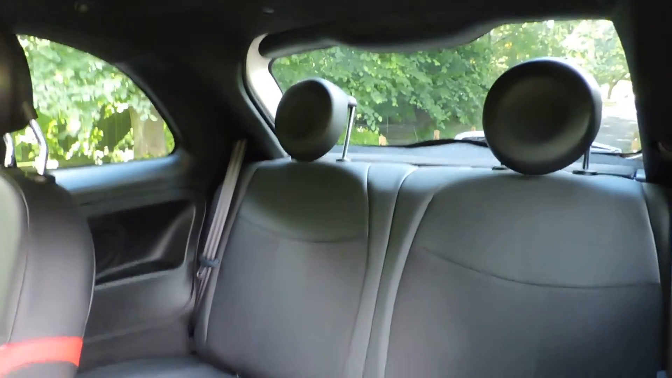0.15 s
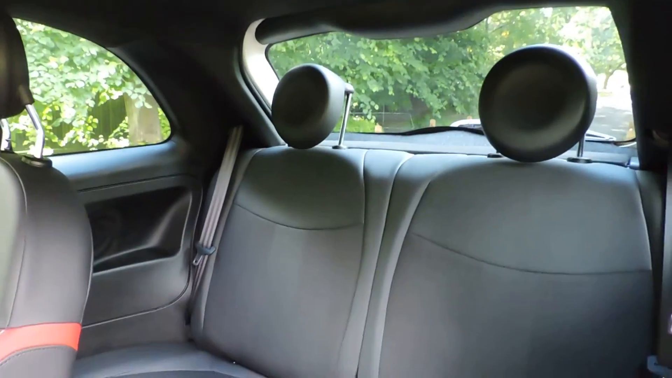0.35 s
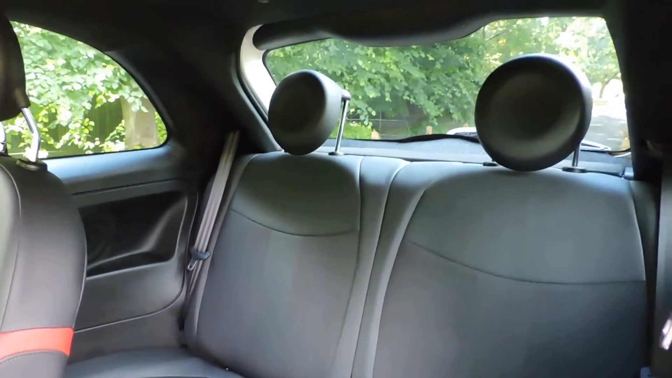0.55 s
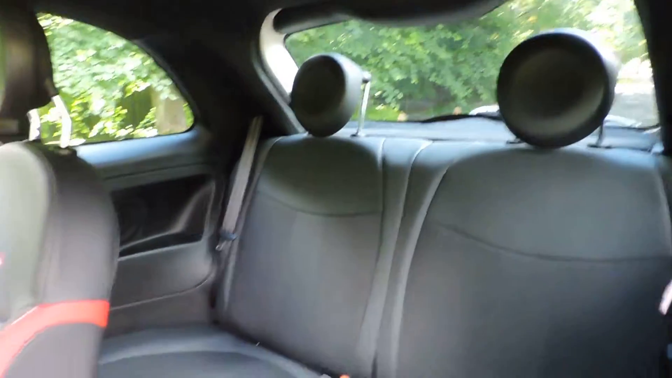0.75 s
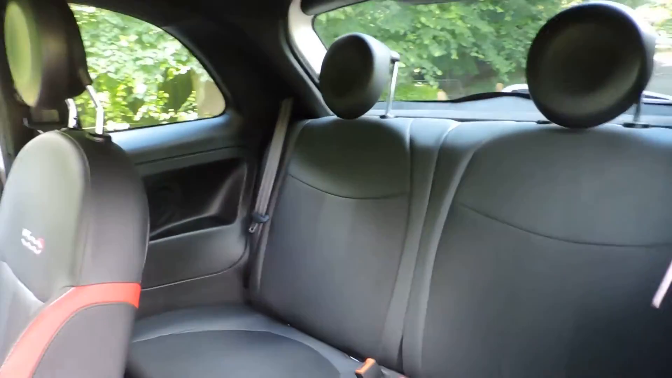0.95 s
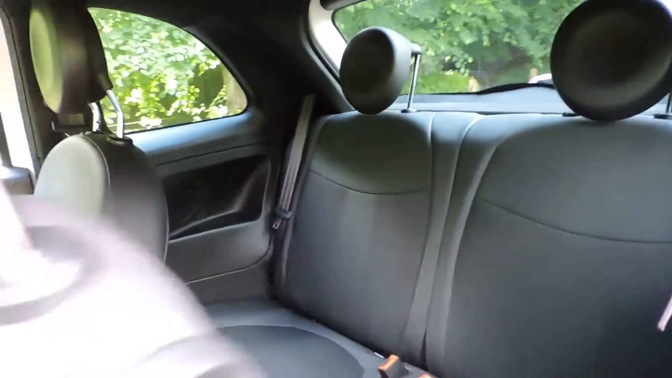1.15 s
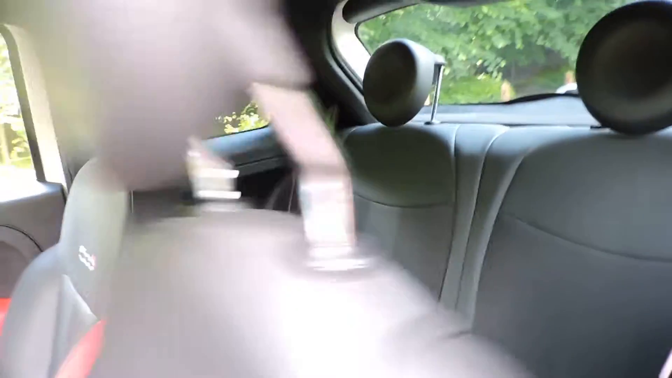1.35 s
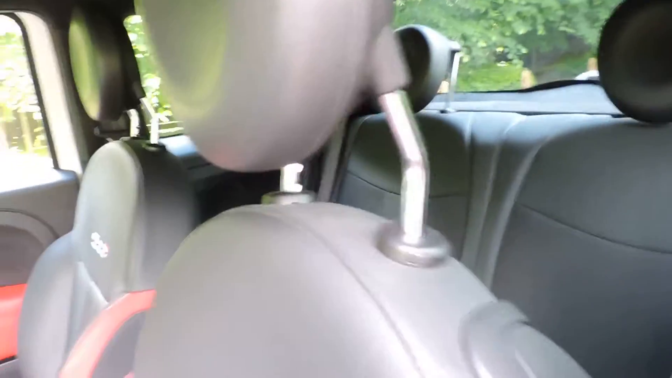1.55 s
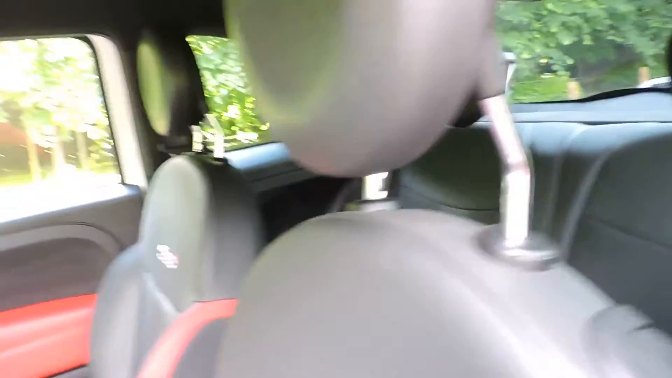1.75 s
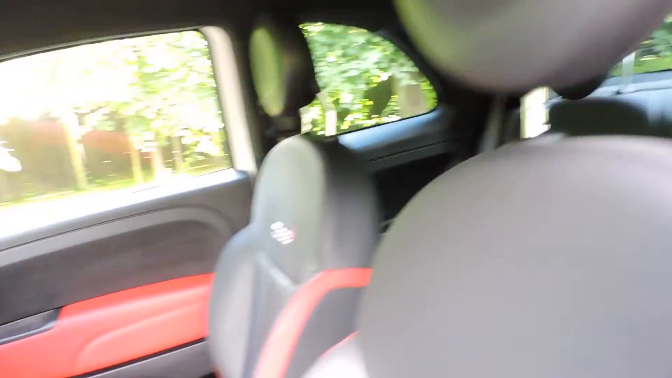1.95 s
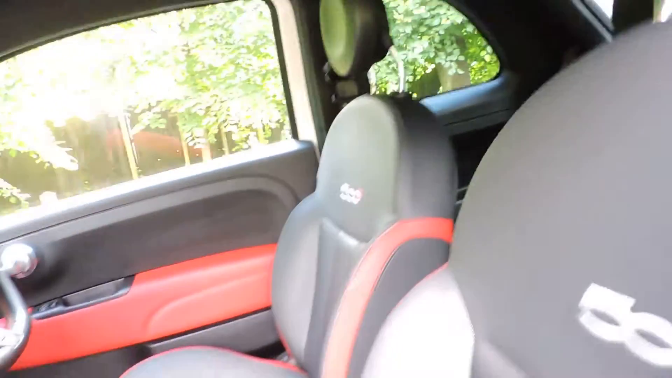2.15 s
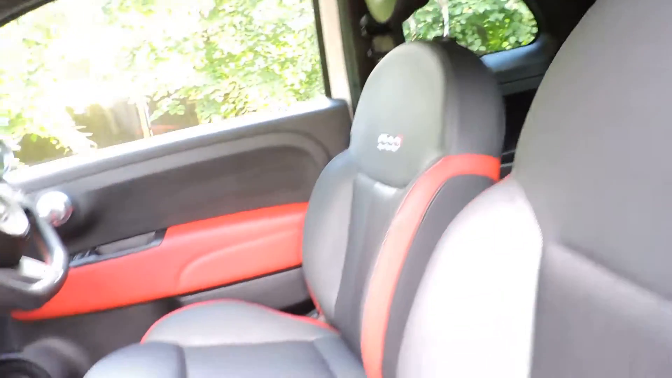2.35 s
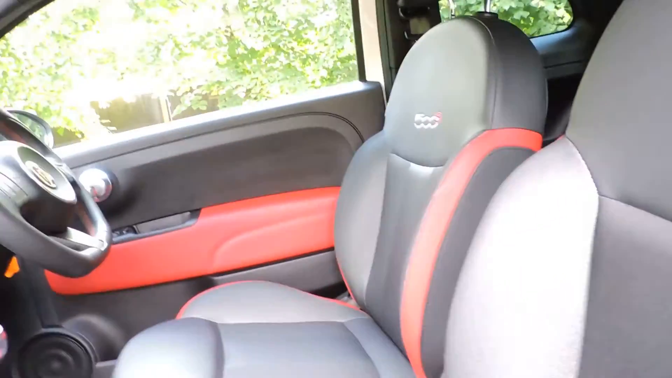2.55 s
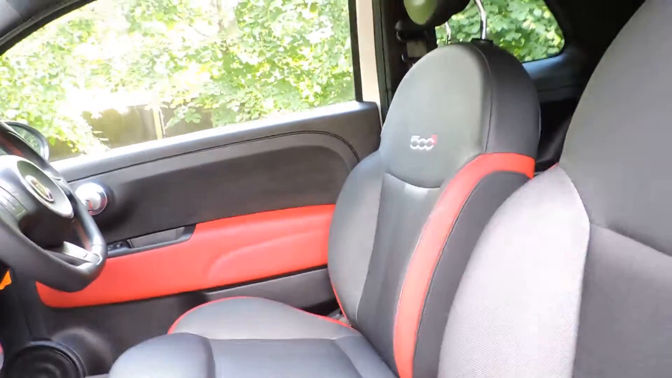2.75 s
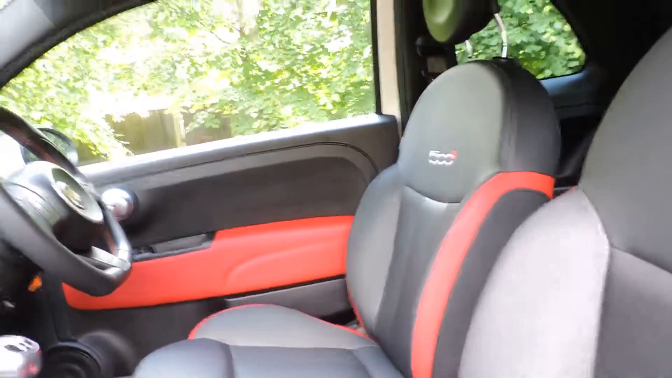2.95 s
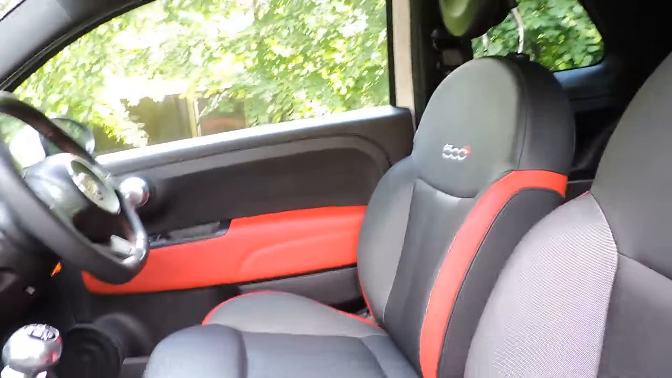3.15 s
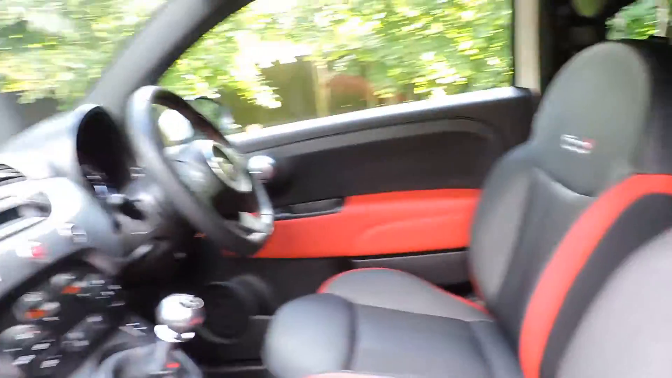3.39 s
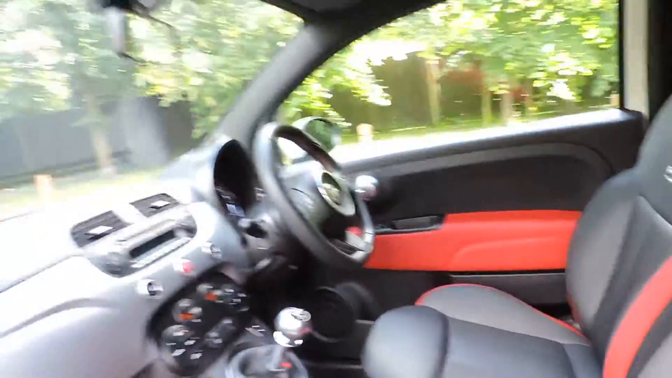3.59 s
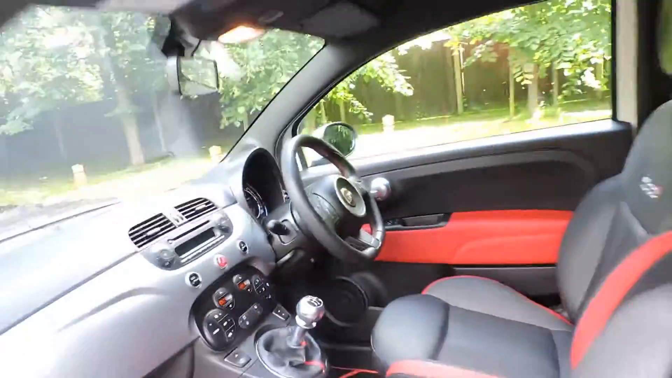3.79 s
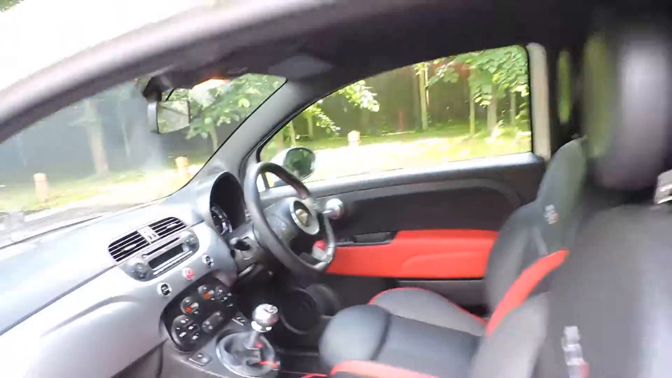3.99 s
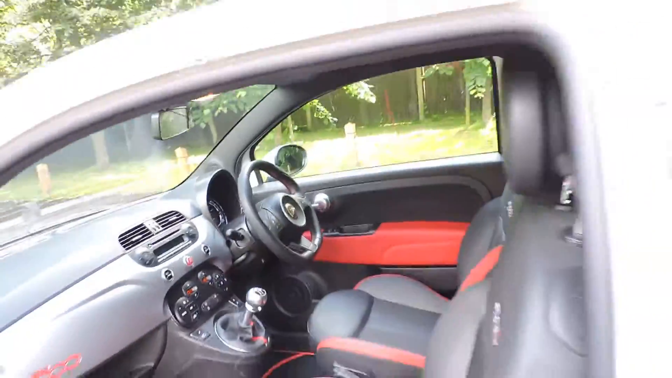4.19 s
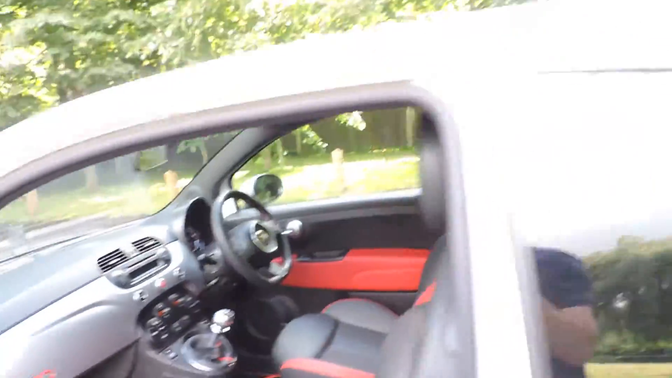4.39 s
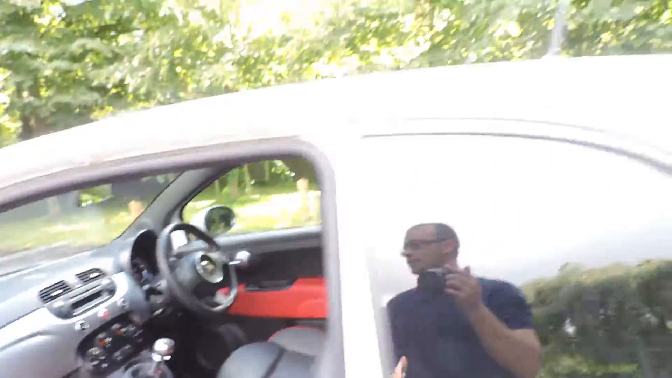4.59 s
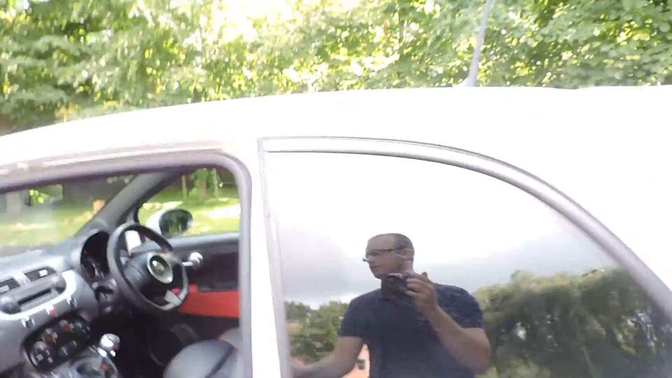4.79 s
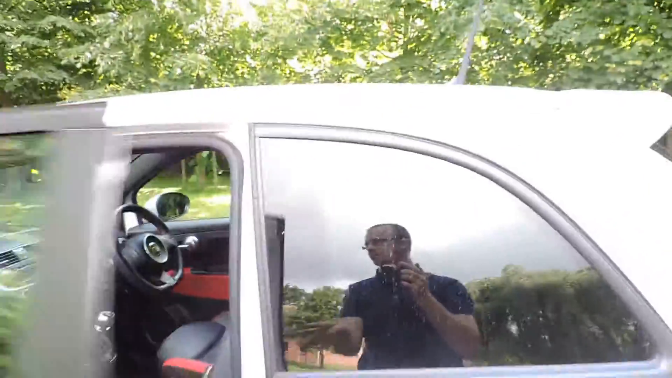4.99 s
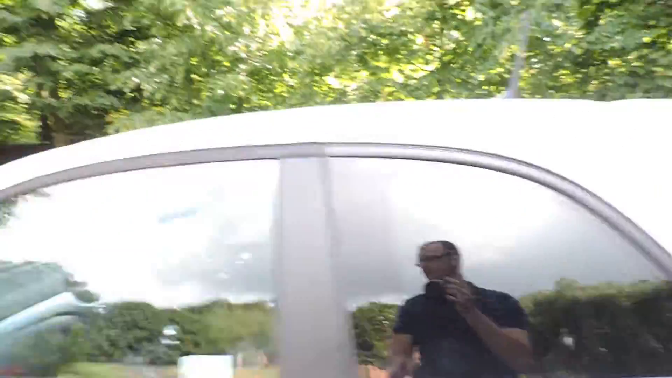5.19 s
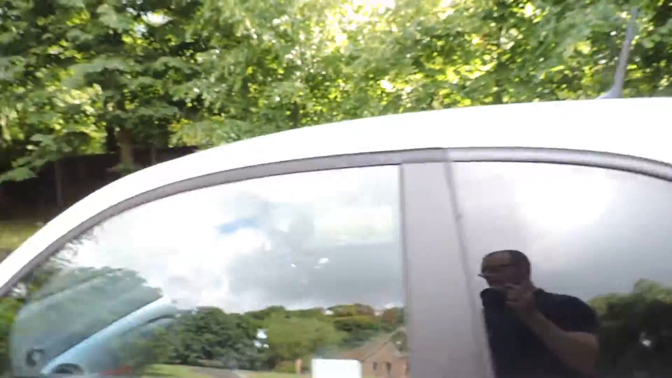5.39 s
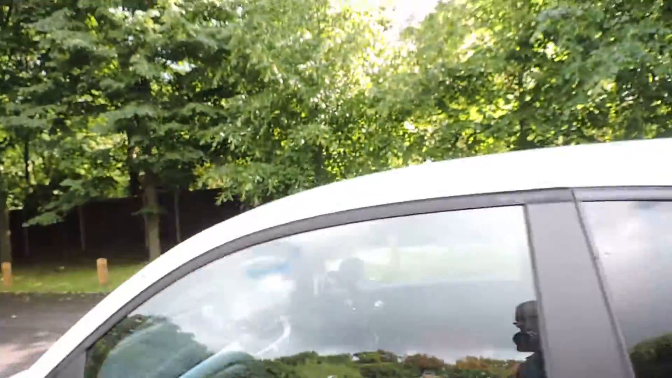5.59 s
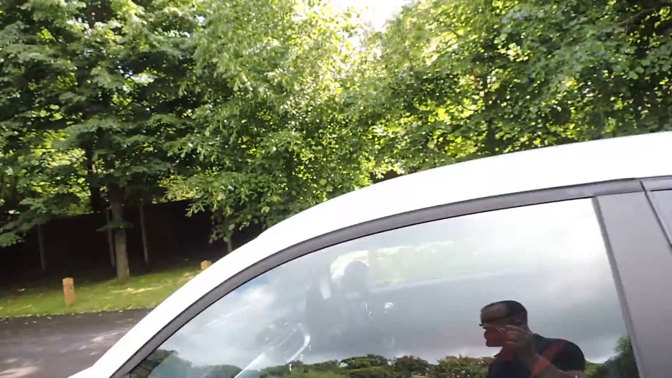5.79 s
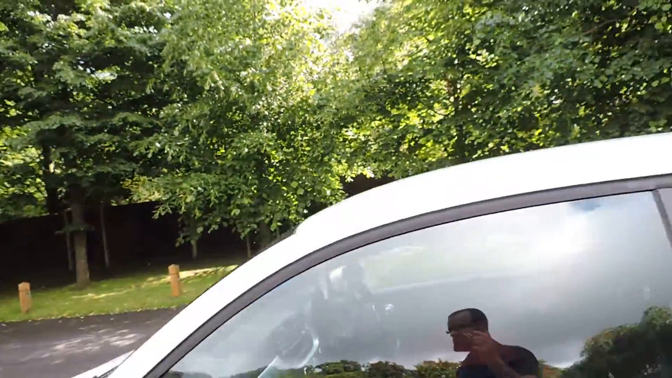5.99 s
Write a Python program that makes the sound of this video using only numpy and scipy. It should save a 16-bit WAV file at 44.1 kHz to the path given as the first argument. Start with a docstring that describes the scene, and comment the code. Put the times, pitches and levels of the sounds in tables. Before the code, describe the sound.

Low wavering hum with thin birdsong, a sharp seat-catch snap, a booming seat thud, rattling knocks, and an overloading car door slam.

```python
"""Inside a small parked car, over a wavering hum and soft hiss, a bird whistles the first of its thin falling sweeps.
A catch snaps open and a seat back swings up against its stop: noise bursts, ringing modes and low cabin booms.
Someone climbs out with knocks, ticks, brushing clothes (swelling noise), a ringing spring and hollow clacks.
The door slams: striker ring, panel modes and boom overload the microphone; the gain control ducks after loud blows.
The background comes back up, and the bird whistles once more."""
import sys
import numpy as np
from scipy import signal
from scipy.fft import rfft, irfft, next_fast_len
from scipy.io import wavfile
from scipy.ndimage import uniform_filter1d

SR = 44100
rng = np.random.default_rng(int(sys.argv[2]) if len(sys.argv) > 2 else 0)


def store_pcm(level_fs):
    """Save levels as 16-bit WAV."""
    pcm = np.round(np.clip(level_fs, -1, 1) * 32767).astype(np.int16)
    wavfile.write(sys.argv[1], SR, np.atleast_2d(pcm).T)


N = 265923
TIME = np.arange(N) / SR  # s
AGE = TIME[:SR // 2]  # time since an event began, s
PORT_HZ = 2540  # about here and above, the two microphone ports hear unrelated noise


def undb(db):
    """Decibels to gain."""
    return 10 ** (np.asarray(db) / 20)


def unit(x):
    """Scale to rms 1."""
    return x / np.sqrt(np.mean(x ** 2))


def fade(t60):
    """Exponential decay that loses 60 dB in t60 seconds."""
    return np.exp(-np.log(1000) * AGE / max(t60, 1e-3))


def add(out, s, x):
    """Mix x into out from time s."""
    i = max(int(s * SR), 0)
    out[:, i:i + x.shape[-1]] += x[..., :N - i]


def bins(size):
    """Frequencies of a spectrum of this many samples, kept at 1 Hz or above."""
    return np.maximum(np.fft.rfftfreq(size, 1 / SR), 1)


def colour(points, tilt_db=0):
    """Gain against frequency through (f/Hz, level/dB) points, tilted by tilt_db per octave."""
    hz, db = np.transpose(points)
    return lambda f: undb(np.interp(np.log(f), np.log(hz), db) + tilt_db * np.log2(f))


def resonance(hz, width):
    """Gain against frequency of a steep-sided resonance; 0.85 of width sets its breadth."""
    return lambda f: 1 / (1 + ((f * f - hz * hz) / (f * width * 0.85)) ** 2)


def noise(gain, size):
    """Coloured stereo noise of rms 1: nearly alike at both ports in the bass, unrelated in the treble."""
    f = bins(size)
    mid, side = np.exp(2j * np.pi * rng.random((2, len(f))))
    apart = np.minimum(0.1 + (f / PORT_HZ) ** 1.13, 1)
    ports = mid + apart * side * np.array([[1], [-1]])
    return unit(irfft(gain(f) * ports / np.hypot(1, apart), size))


def burst(gain, envelope):
    """Coloured noise under an envelope, carrying just the energy of that envelope."""
    return unit(noise(gain, len(AGE)) * envelope) * np.sqrt(np.mean(envelope ** 2))


def blow(gain, t60, rise, cabin_db, cabin_t60):
    """A contact builds up over rise seconds and sets off a dense rattle and the duller tail of the cabin."""
    contact = 1 - np.exp(-AGE / rise)
    tail = burst(lambda f: gain(f) / np.hypot(1, f / 2500), contact * fade(cabin_t60))
    return burst(gain, contact * fade(t60)) + undb(cabin_db) * tail


def ring(modes):
    """Decaying modes that build up within a cycle; the higher ones reach the two ports out of step."""
    out = 0
    for hz, db, t60 in modes:
        skew = min(hz / PORT_HZ, 1) * np.array([[.9], [-.9]])  # radians
        envelope = (1 - np.exp(-np.pi * hz * AGE)) * fade(t60)
        detuned_hz = hz * (1 + 0.0026 * rng.standard_normal())
        out = out + undb(db) * envelope * np.sin(2 * np.pi * detuned_hz * AGE + skew)
    return out


def heave(hz, rise, t60):
    """One low resonance pushed up over rise seconds and left to die away."""
    return (1 - np.exp(-(AGE / rise) ** 2)) * fade(t60) * np.sin(2 * np.pi * hz * AGE)


def stroke(length, hz, width):
    """Band of noise that swells and fades over length seconds."""
    return np.sin(np.pi * np.minimum(AGE / length, 1)) * noise(resonance(hz, width), len(AGE))


def walk(rate):
    """Slow chance: random levels held 1 / rate s and slewed twice; spread near 1."""
    k = int(SR / rate)
    steps = np.repeat(rng.standard_normal(N // k + 1), k)
    return 1.294 * uniform_filter1d(uniform_filter1d(steps, k), k)[:N]


def background():
    """A wavering low hum and rumble under soft swells of hiss."""
    # background levels with soft swells of hiss: t/s, rumble level/dB, hiss level/dB, before the lifts below
    levels = [(0.0, -40, -52.5), (0.32, -44, -55), (0.92, -38, -51.5), (1.32, -34, -47.5),
              (1.66, -41, -52.5), (2.75, -42.5, -55), (3.01, -38.5, -54.5), (3.43, -41, -51.5),
              (4.36, -37, -53), (4.6, -37, -49.5), (5.15, -39.5, -55), (5.5, -45, -54), (6.03, -40, -54.5)]
    # shared spectrum of rumble and hiss: f/Hz, level/dB
    background_colour = [(13, -5), (22, 0.5), (114, -4.5), (150, 0), (220, -9), (246, -14), (282, -9.5),
                         (438, -15.5), (625, -22), (823, -24), (2330, -33.5), (3930, -43.5), (7810, -51),
                         (11800, -53), (15500, -53.5)]
    # steady hum partials: f/Hz, relative level/dB
    hum_partials = [(58.6, -6.5), (100, -10.5), (143.6, -9.5), (217, -14), (288, -22), (360, -17.5),
                    (432, -20.5)]
    s, *columns = np.transpose(levels)
    rumble_db, hiss_db = (np.interp(TIME, s, c) for c in columns)
    shape, size = colour(background_colour), next_fast_len(N)
    rumble = noise(lambda f: shape(f) / np.hypot(1, (f / 600) ** 2), size)[:, :N]
    hiss = noise(lambda f: shape(f) / np.hypot(1, (600 / f) ** 3), size)[:, :N]
    hum = 0
    for hz, db in hum_partials:
        level = undb(db + 3.2 * walk(9))
        wavering_hz = hz + 1.45 * walk(7.1)
        hum = hum + level * np.sin(2 * np.pi * np.cumsum(wavering_hz) / SR)
    low = undb(rumble_db + 1.0) * (rumble + undb(0.5) * hum)
    return low + undb(hiss_db + 3.5 + 1.26 * walk(12)) * hiss


def bird():
    """Thin whistles that fall fast, then level off, smeared by the trees (a decaying noise echo)."""
    # notes: t/s, length/s, start f/Hz, level/dB before the trees
    bird_notes = [(0.338, 0.12, 7730, -71), (3.084, 0.14, 7700, -71), (4.523, .16, 8000, -64),
                  (4.778, 0.14, 7100, -69), (5.004, .09, 7300, -68), (5.897, 0.16, 8090, -60)]
    fall = .8  # end pitch over start pitch
    out = np.zeros((2, N))
    for s, length, start_hz, db in bird_notes:
        u = np.minimum(AGE / length, 1)
        hz = start_hz * (fall + (1 - fall) * (1 - u) ** 2.1)
        envelope = np.sqrt(np.minimum(12 * u, 1) * (1 - u))
        add(out, s, undb(db) * envelope * np.sin(2 * np.pi * np.cumsum(hz) / SR))
    trees = unit(rng.standard_normal((2, len(AGE))) * fade(0.74)) / np.sqrt(len(AGE))
    return out + undb(5) * signal.fftconvolve(out, trees, axes=1)[:, :N]


def rubs():
    """Low scuffs, faint rushes, brushing clothes and the squeezed door seal: noise swells of uneven level."""
    # low scuffs and soft, faint rushes of noise: middle t/s, length/s, level/dB, centre f/Hz
    scuffs = [(1.106, 0.085, -28.5, 256), (1.132, 0.17, -42.5, 1120), (1.444, .018, -25, 900),
              (2.93, .08, -26.5, 324), (3.332, 0.084, -46.5, 825), (3.932, .2, -57, 5000)]
    # clothes brushing: middle t/s, length/s
    swishes = [(2.029, 0.27), (2.228, 0.32), (3.585, 0.32)]
    scuff_width = 1.85  # as a share of the centre
    cloth_db, cloth_hz, cloth_width_hz = -59, 11000, 5700
    # the rubber seal squeezed as the door closes
    seal_s, seal_length_s, seal_db, seal_hz, seal_width_hz = 5.219, .095, -32.5, 350, 980
    out, unevenness = np.zeros((2, N)), undb(2 * walk(90))
    for s, length, db, hz in scuffs:
        add(out, s - length / 2, undb(db) * stroke(length, hz, scuff_width * hz))
    for s, length in swishes:
        add(out, s - length / 2, undb(cloth_db) * stroke(length, cloth_hz, cloth_width_hz))
    seal = stroke(seal_length_s, seal_hz, seal_width_hz)
    add(out, seal_s - seal_length_s / 2, undb(seal_db) * seal)
    return out * unevenness


def ticks():
    """Light contacts of plastic, each with one broad resonance; the lower ones last longer, down to 600 Hz."""
    # ticks and bumps: t/s, level/dB, centre f/Hz
    tick_hits = [(0.566, -35, 1800), (0.59, -39, 1000), (.884, -38.5, 1190), (1.548, -34, 1340),
                 (1.832, -29, 1470), (3.034, -36, 825), (3.307, -32.5, 600), (3.485, -34, 1350),
                 (3.58, -38.5, 1000), (3.746, -34, 1690), (3.846, -24, 268), (3.987, -28.5, 2020),
                 (4.597, -28, 1610), (5.047, -35, 1640), (5.548, -25, 1490)]
    width, cycles = 0.7, 31.5  # share of the centre; cycles to lose 60 dB, for centres from 600 Hz
    out = np.zeros((2, N))
    for s, db, hz in tick_hits:
        t60 = cycles / max(hz, 600)
        tick = blow(resonance(hz, width * hz), t60, rise=0.00075, cabin_db=-13, cabin_t60=0.1)
        add(out, s, undb(db) * tick)
    return out


def rattles():
    """Loose fittings are shaken into brief noise bursts, all with the same bright colour."""
    # shakes: t/s, level/dB, t60/s
    shakes = [(2.894, -39, 0.21), (3.303, -35.5, 0.11), (3.337, -44, 0.24), (3.847, -41, .07),
              (3.973, -42.5, 0.13), (4.449, -46.5, 0.16), (5.235, -22, 0.052)]
    # spectrum: f/Hz, level/dB
    rattle_colour = [(300, -9), (1500, 8), (3000, -4), (6000, -2.5), (9500, -7.5), (13500, -0.5),
                     (15500, -11)]
    out = np.zeros((2, N))
    for s, db, t60 in shakes:
        rattle = blow(colour(rattle_colour), t60, rise=0.0006, cabin_db=-19, cabin_t60=0.09)
        add(out, s, undb(db) * rattle)
    return out


def clacks():
    """A loose hollow part bounces against the trim, ringing over a short noisy chatter."""
    # bounces: t/s, level/dB
    bounces = [(3.337, -30.5), (3.348, -32), (3.3753, -18.5), (3.4074, -25.5)]
    # hollow ring: f/Hz, level/dB, t60/s
    clack_modes = [(595, -23, 0.013), (910, 1.5, 0.023), (1004, -9, 0.048), (1090, -30, 0.015),
                   (2100, -25, 0.05)]
    out = np.zeros((2, N))
    for s, db in bounces:
        chatter = blow(resonance(660, 650), 0.058, rise=0.00042, cabin_db=-28, cabin_t60=0.13)
        add(out, s, undb(db) * (ring(clack_modes) + undb(-8.5) * chatter))
    return out


def knocks():
    """Padded blows on seat and trim: a noise thud, tilted bright or dull, with ringing trim; a spring rings on."""
    # blows: t/s, relative level/dB, rattle t60/s, tilt/(dB per octave), relative ring level/dB
    knock_hits = [(0.622, -28.5, 0.063, 0, -11), (1.4461, -4.5, 0.036, 1.4, -3),
                  (1.4585, -21.5, 0.12, -1.8, 3), (1.489, -18, 0.16, -3.5, -9), (1.657, -30.5, 0.06, 2, -2),
                  (2.404, -34.5, 0.13, 4, -2), (2.8945, -17.5, 0.063, -0.5, 1),
                  (2.901, -13, 0.13, -2.2, -2), (2.938, -22, 0.076, 1, 7), (2.953, -17.5, 0.06, -3, -2),
                  (3.181, -24, 0.15, 1.7, -18)]
    # trim ring: f/Hz, level/dB, t60/s
    trim_modes = [(105, -9, 0.13), (136.2, -1.5, 0.21), (183.4, 0.5, .2), (234.5, 3.5, 0.27),
                  (315, -9.5, 0.12), (344.7, -4, 0.19), (436, -9, 0.17), (620, -9, 0.054), (716, -8, 0.07),
                  (907, -5, 0.06), (1318, -6.5, 0.063), (1825, -23, .1), (2140, -23.5, 0.054),
                  (3510, -34.5, 0.052)]
    # thud spectrum: f/Hz, level/dB
    trim_colour = [(47, -38), (80, -4), (263, -3), (343, -8.5), (809, -13), (903, -12), (1130, -24.5),
                   (2230, -24), (2970, -35), (13900, -56), (15500, -68)]
    # spring left ringing: f/Hz, level/dB, t60/s
    spring_modes = [(456, 1.5, 0.65), (647, -9, 1.3), (850, -36, 4.4), (1163, -9.5, 0.38)]
    spring_s, spring_db = 3.185, -36
    out = np.zeros((2, N))
    for s, db, t60, tilt_db, ring_db in knock_hits:
        thud = blow(colour(trim_colour, tilt_db), t60, rise=0.00056, cabin_db=-13.0, cabin_t60=0.2)
        add(out, s, undb(db - 2) * (thud + undb(ring_db - 9) * ring(trim_modes)))
    add(out, spring_s, undb(spring_db) * ring(spring_modes))
    return out


def booms():
    """Heavy movements pump the air of the cabin at its lowest resonance; the door panel flexes above it."""
    # heavy movements: t/s, level/dB, rise/s
    pushes = [(0.74, -19.5, 0.03), (.99, -21.5, 0.013), (1.099, -9.5, 0.042), (1.4378, 7, 0.07),
              (1.585, -12.5, 0.049), (5.2186, 5, 0.015)]
    cabin_hz, cabin_t60_s = 33.9, 0.29
    flex_s, flex_db, flex_hz, flex_t60_s = 5.245, -2.5, 59, .23  # the door panel as it lands
    out = np.zeros((2, N))
    for s, db, rise in pushes:
        add(out, s, undb(db) * heave(cabin_hz, rise, cabin_t60_s))
    add(out, flex_s, undb(flex_db) * heave(flex_hz, rise=0.01, t60=flex_t60_s))
    return out


def catch():
    """A sprung catch scrapes, snaps free and bounces: sharp noise contacts, each with ringing modes."""
    # contacts: t/s, relative level/dB, rattle t60/s
    contacts = [(.671, -31.5, 0.12), (0.6938, -24.5, 0.12), (0.7119, -9, 0.098), (0.7201, 2, 0.042),
                (0.7274, -5.5, 0.033), (0.7349, -6, 0.03), (0.744, -24.5, 0.034)]
    # ring: f/Hz, level/dB, t60/s
    catch_modes = [(350, -7, 0.078), (560, -15, .055), (856, 0.5, 0.053), (1190, -19, 0.083),
                   (1540, 9, 0.04), (2420, -11.5, 0.082), (2880, -5, 0.046), (3435, -9, 0.04),
                   (5450, -14, 0.042)]
    # contact spectrum: f/Hz, level/dB
    catch_colour = [(88, -49), (150, -20.5), (540, -6), (708, -10.5), (781, -5.5), (1290, -13), (1540, -11),
                    (2270, -13), (3410, -16.5), (3690, -33), (4310, -20), (15500, -36)]
    out = np.zeros((2, N))
    for s, db, t60 in contacts:
        snap = blow(colour(catch_colour), t60, rise=0.00034, cabin_db=-38, cabin_t60=0.068)
        add(out, s, undb(db - 5.0) * (snap + undb(-9) * ring(catch_modes)))
    return out


def door():
    """The latch rings on the striker, then the panel sinks into the rubber seal, hits the frame and shudders."""
    # latch riding over the striker: t/s, level/dB
    striker_hits = [(5.2188, -4.5), (5.2241, -1.5), (5.2294, 0.5)]
    # striker ring: f/Hz, level/dB, t60/s
    striker_modes = [(747, 1, 0.031), (866, -9, 0.049), (1112, -13, 0.062), (1200, -14.5, 0.09)]
    # door meeting seal and frame: t/s, relative level/dB, rattle t60/s
    slam_hits = [(5.2191, -9.5, 0.068), (5.2296, 6.5, 0.077), (5.2408, 4, 0.028), (5.2546, 4.5, 0.062),
                 (5.2746, -4, 0.058), (5.283, -12, 0.048)]
    # panel ring: f/Hz, level/dB, t60/s
    door_modes = [(100.5, -2.5, 0.15), (158.8, -12, 0.26), (237.3, -8, 0.22), (275.6, -7, 0.2),
                  (335, 6, 0.12), (372.3, -4, 0.18), (437, -7, 0.16), (478, -10.5, 0.26), (638, -17.5, 0.1),
                  (1128, -15, 0.08), (1402, -26, 0.086), (1717, -14.5, 0.048), (2460, -23, 0.042)]
    # thud spectrum: f/Hz, level/dB
    door_colour = [(47, -29.5), (80, -0.5), (152, -4), (343, -2), (556, -15.5), (864, -15), (1570, -30.5),
                   (2280, -27.5), (3700, -45), (4040, -45.5), (15500, -61.5)]
    out = np.zeros((2, N))
    for s, db in striker_hits:
        add(out, s, undb(db) * ring(striker_modes))
    for s, db, t60 in slam_hits:
        thud = blow(colour(door_colour), t60, rise=0.00082, cabin_db=-27.5, cabin_t60=0.39)
        add(out, s, undb(db - 2.5) * (thud + undb(-8.5) * ring(door_modes)))
    return out


def scene():
    """All sources, slightly unequal at the two ports."""
    # port balance: f/Hz, left minus right level/dB
    balance = [(30, -3.5), (200, -1.1), (500, -2.1), (1100, -0.5), (2200, 0), (4000, 2.5), (8000, 1),
               (14000, 3)]
    mix = background() + bird() + rubs() + ticks() + rattles() + clacks()
    mix = mix + knocks() + booms() + catch() + door()
    size = next_fast_len(N)
    lean = colour(balance)(bins(size)) ** np.array([[.5], [-.5]])
    return irfft(rfft(mix, size) * lean, size)[:, :N]


def duck(x):
    """Gain control: follows the peaks, turns down a moment after a loud blow and recovers slowly."""
    half_gain_db = -3  # held peak level that halves the gain
    lag_s, attack_s, release_s = 0.077, 0.14, 0.16  # delay, then two time constants
    release, step = np.exp(-TIME / release_s), 1 / (attack_s * SR)
    peak = np.minimum(np.abs(x).max(axis=0), 1)
    held = release * np.maximum.accumulate(peak / release)  # each peak decays until a higher one
    late = np.interp(TIME - lag_s, TIME, held)
    power = signal.lfilter([step], [1, step - 1], late ** 2)
    return x / (1 + power / undb(half_gain_db) ** 2)


def record(dry):
    """The recorder ducks after loud blows, hisses faintly, flattens the highest peaks and cuts the top."""
    self_noise_db, top_hz = -72, 15500
    ducked = duck(dry) + undb(self_noise_db) * rng.standard_normal((2, N))
    clipped = .98 * ducked / (1 + ducked ** 4) ** (1 / 4)
    return signal.sosfilt(signal.ellip(8, .2, 70, top_hz, fs=SR, output="sos"), clipped)


dry = scene()
out = record(dry)
store_pcm(out)
```